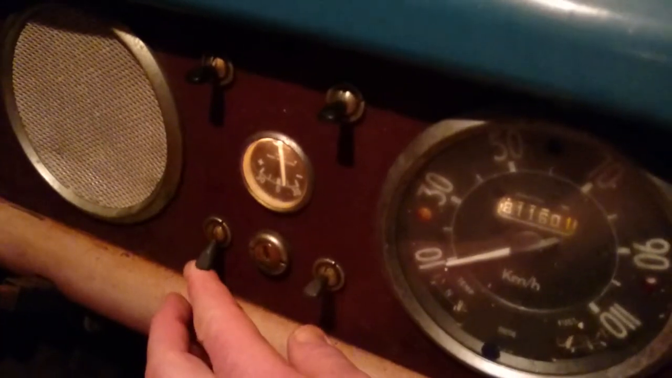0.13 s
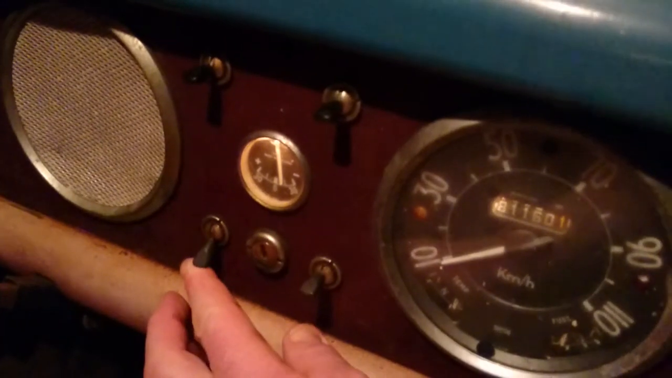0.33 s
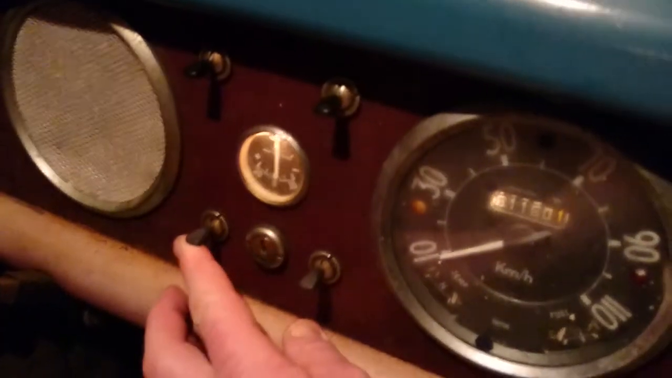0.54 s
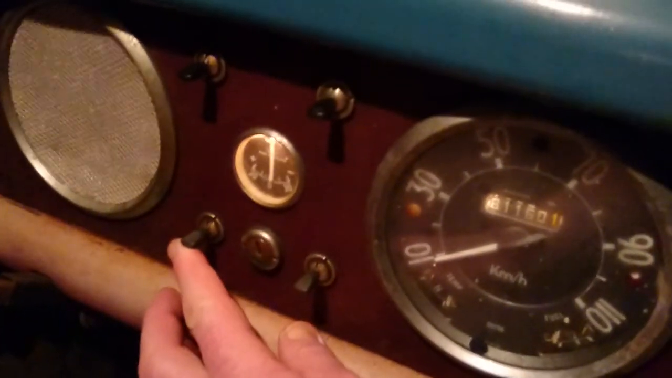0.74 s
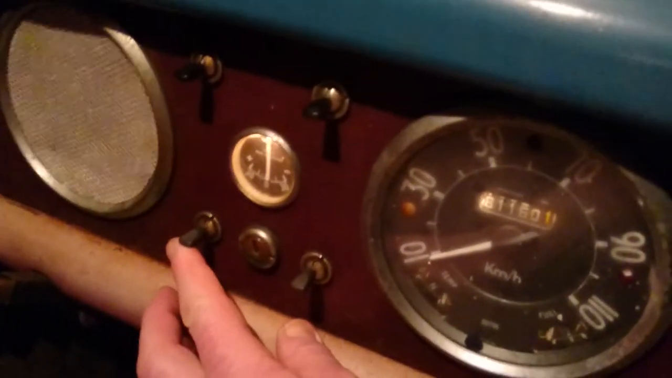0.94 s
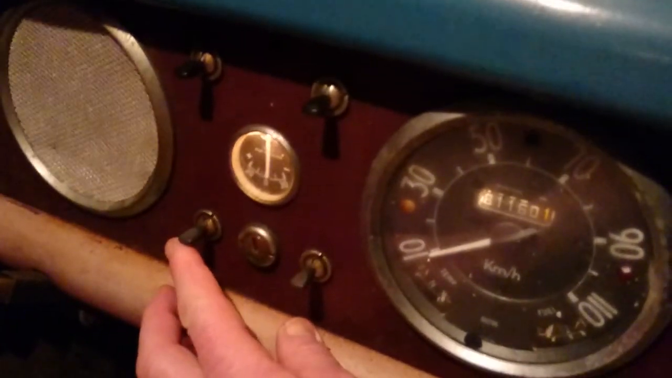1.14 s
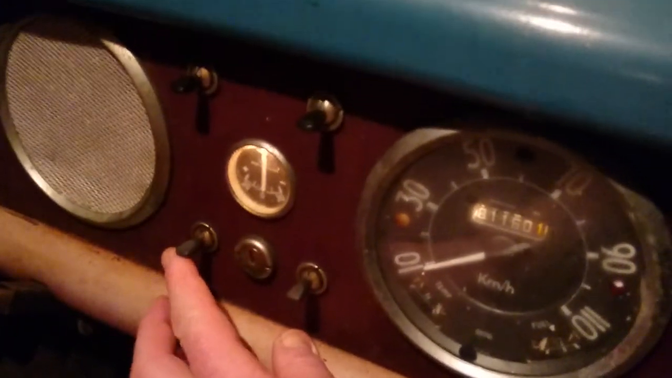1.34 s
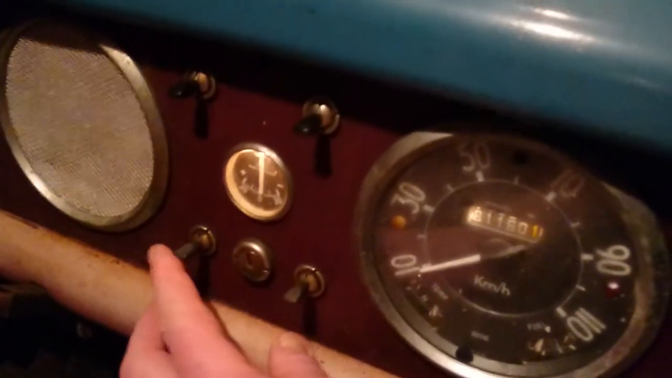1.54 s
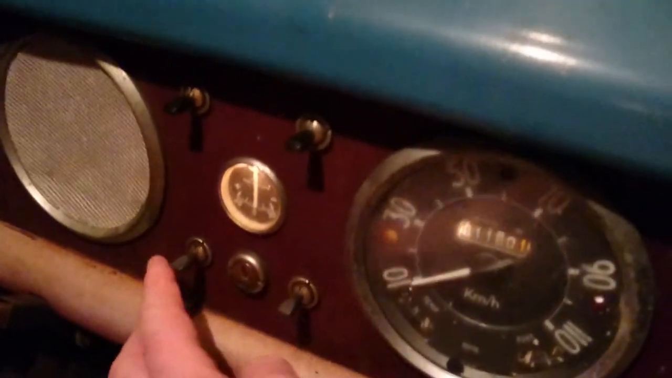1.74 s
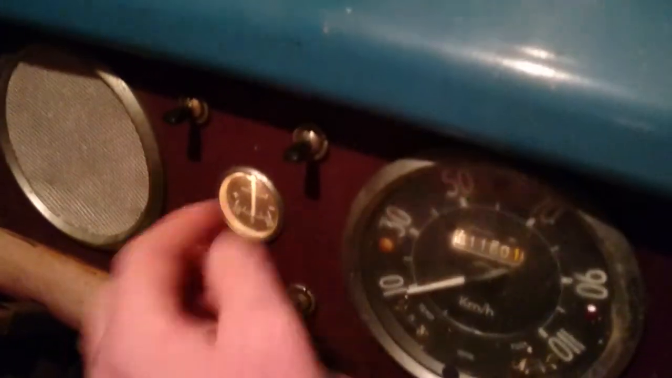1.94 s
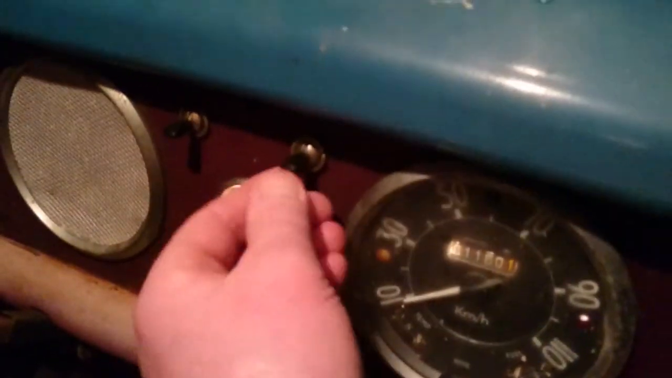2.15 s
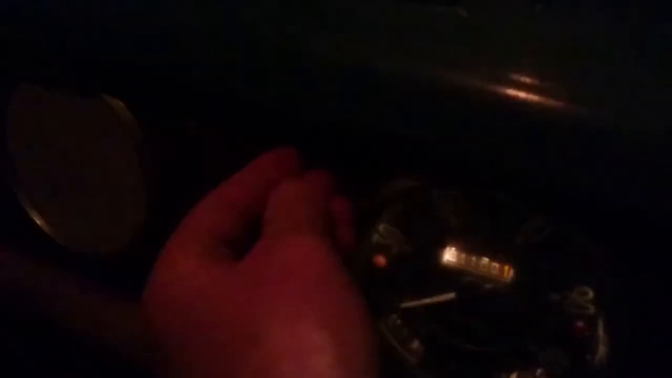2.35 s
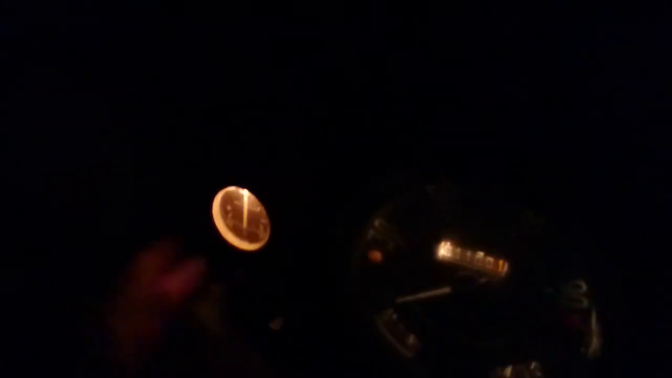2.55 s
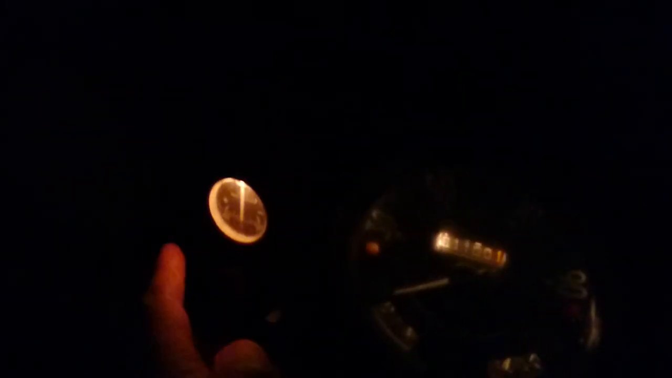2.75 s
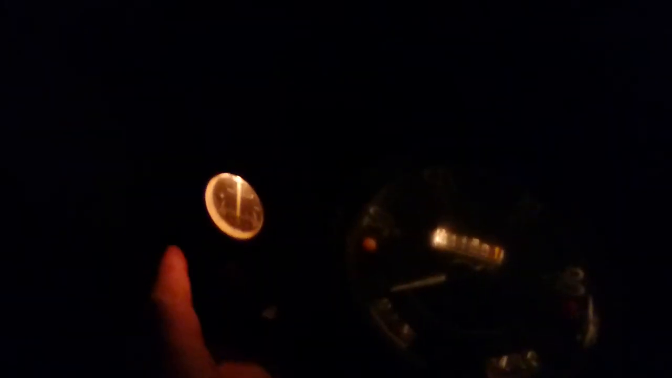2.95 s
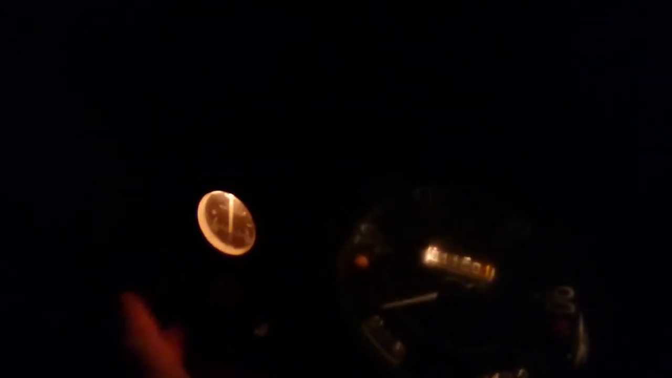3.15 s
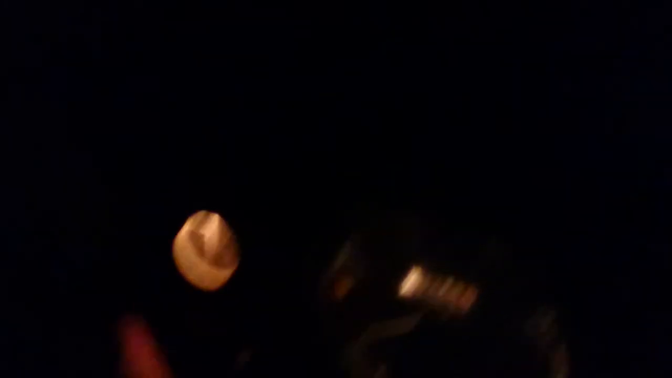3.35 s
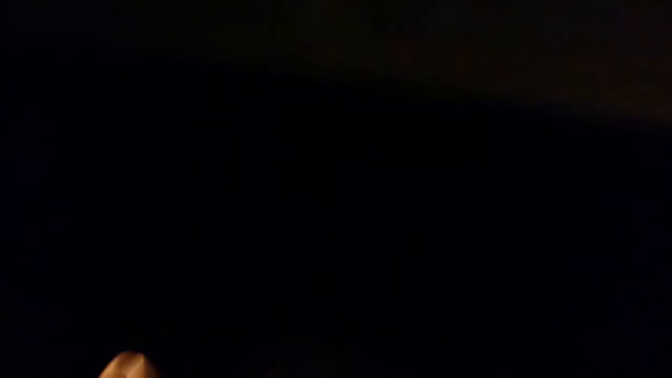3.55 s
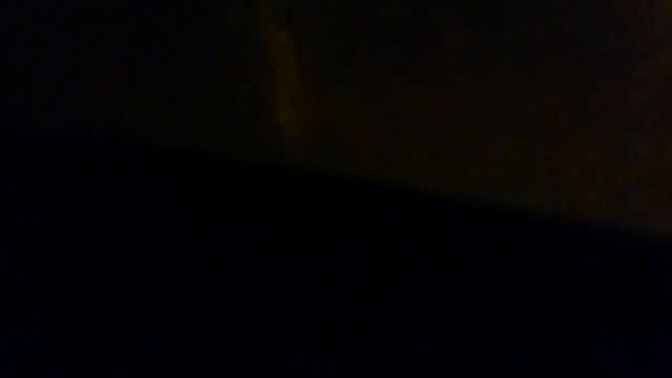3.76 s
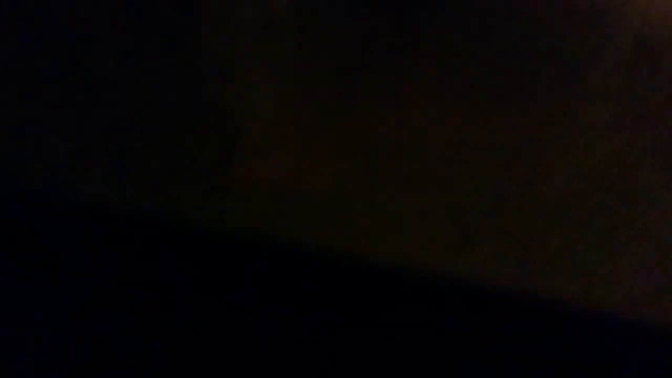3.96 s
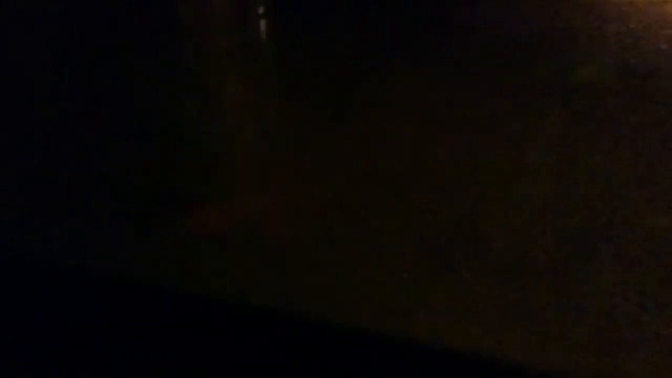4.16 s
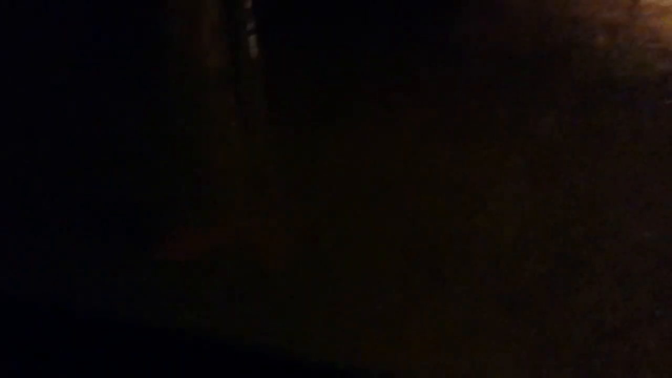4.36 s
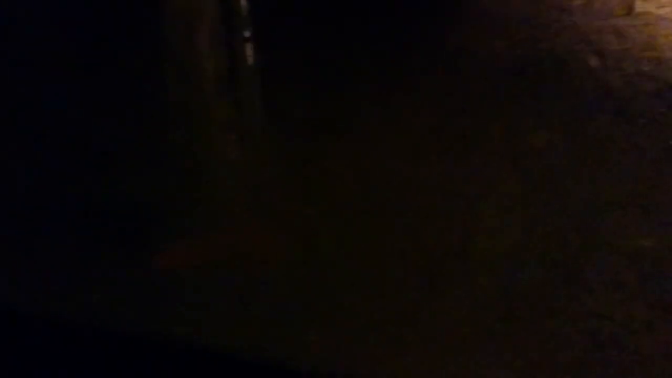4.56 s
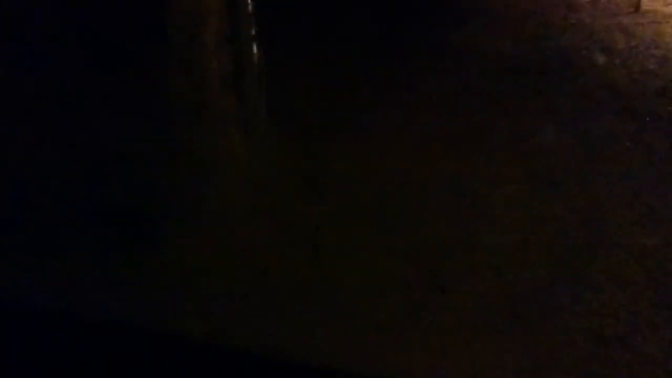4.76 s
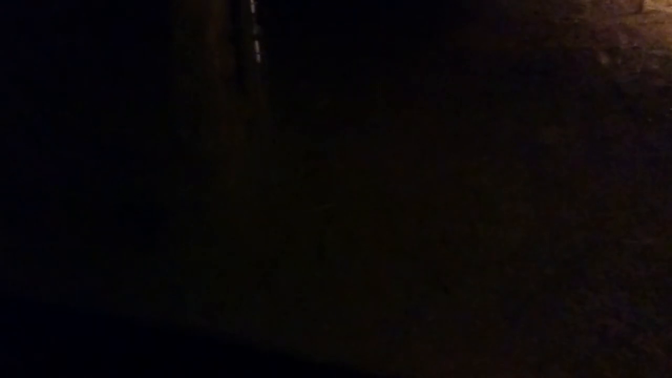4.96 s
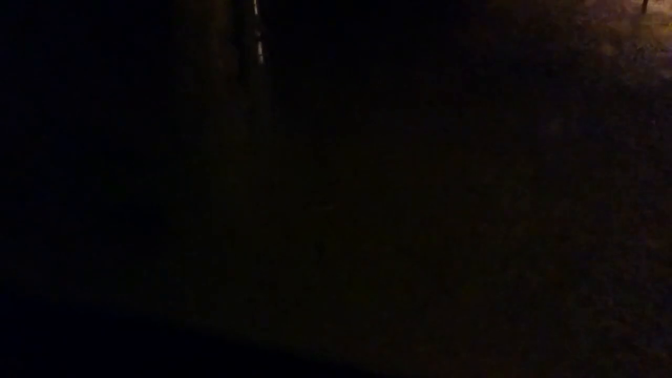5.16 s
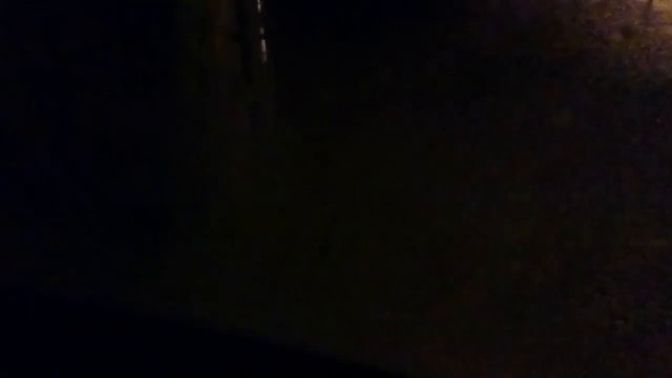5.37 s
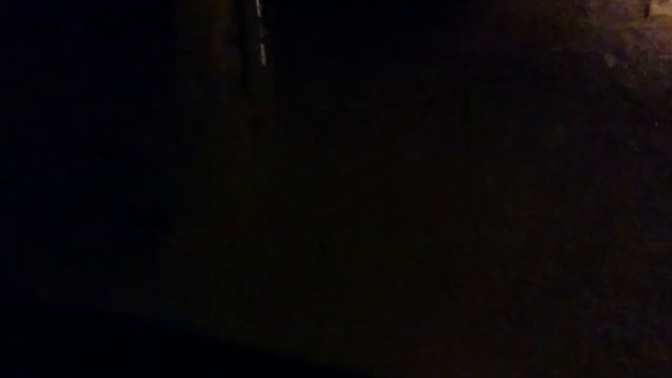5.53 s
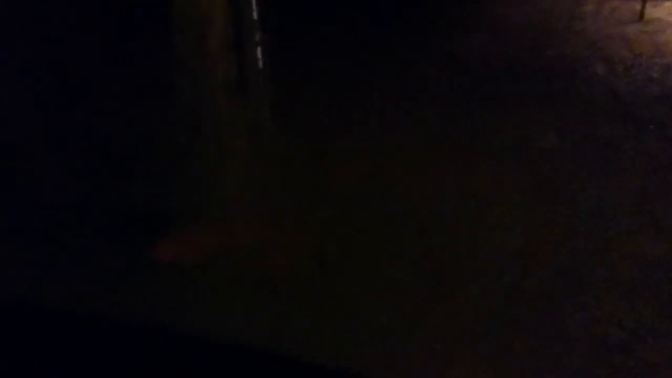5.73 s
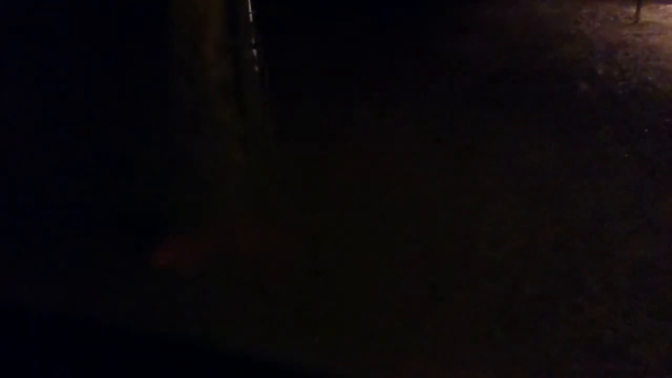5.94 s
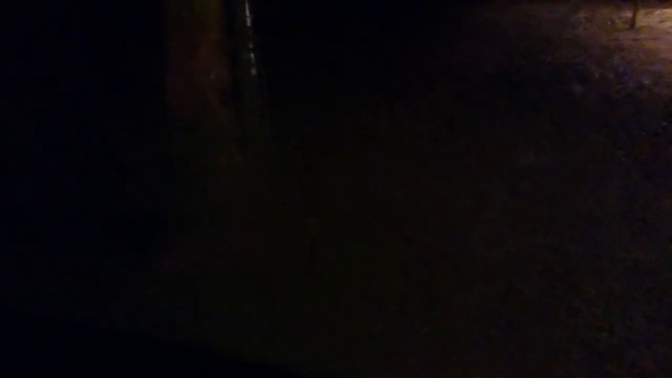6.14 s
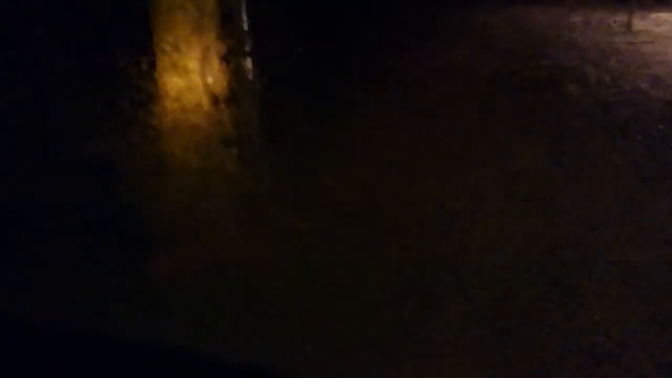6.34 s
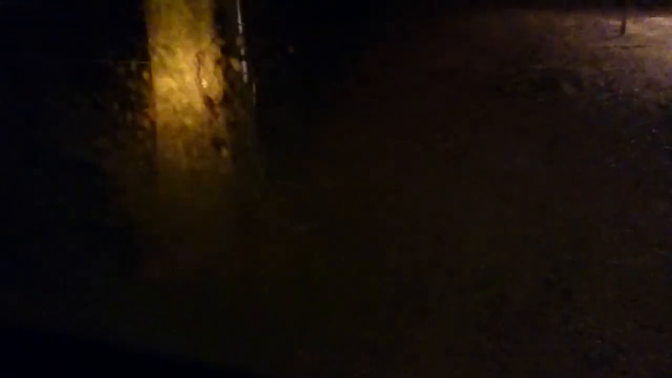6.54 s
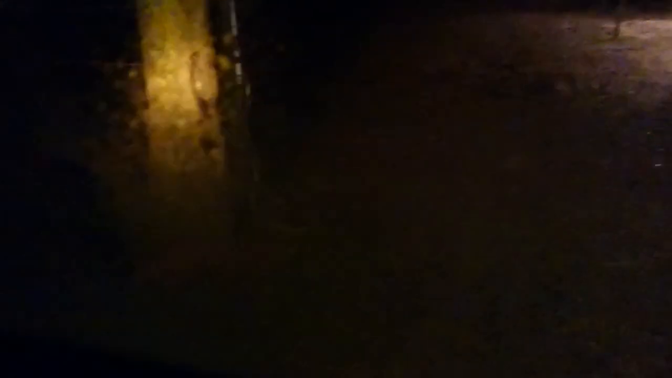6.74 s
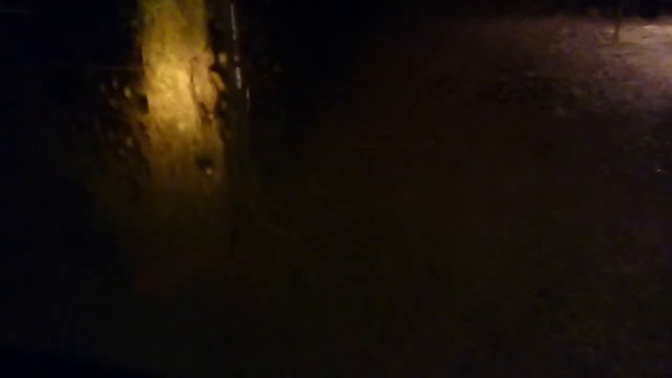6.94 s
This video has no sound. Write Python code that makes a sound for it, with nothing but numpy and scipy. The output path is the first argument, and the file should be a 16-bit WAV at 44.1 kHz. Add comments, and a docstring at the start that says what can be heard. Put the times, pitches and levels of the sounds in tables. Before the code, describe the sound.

Close, crisp switch clicks stand far above a quiet background of steady low humming and thin airy hiss. After two widely spaced snaps come faint creaks and a brush of cloth as the microphone swings from dashboard to windscreen; then three more snaps follow within little over a second. The tight, dry cab gives each a very short noisy tail, and the panel knocks dully beneath the bright tick.

```python
"""In the small cab of an old van, metal toggle switches on the dashboard snap over five times, close by.
Each blow is a sharp click with a ringing lever; the cab answers with a short noisy tail, the panel with fading tones.
A motor hums far off as wavering tones over low noise. Creaking trim and a rustling sleeve are short shaped noises.
Night air is a faint hiss with fuzzy whistles. A hand-held pair of microphones swings from dash to windscreen."""
import sys
import numpy as np
from scipy import signal
from scipy.io import wavfile
from scipy.ndimage import uniform_filter1d

SR = 44100
rng = np.random.default_rng(int(sys.argv[2]) if len(sys.argv) > 2 else 0)


def unload_wav(signal):
    """Save mono or channel-first audio to the path in sys.argv[1] as 16-bit WAV at rate SR, clipped to [-1, 1]."""
    wavfile.write(
        sys.argv[1],
        SR,
        np.round(np.clip(np.atleast_2d(signal).T, -1, 1) * 32767).astype(np.int16),
    )


def nominal_scale(level):
    """Amplitude ratio for a level in decibels (scalar or array-like)."""
    x = np.asarray(level, float) / 20
    return 10 ** x


N = 308655  # length of the scene in samples

# Five throws of the toggle switches. Each row: start in seconds, level of the snap in dB, level of the
# panel's low knock in dB, level of its high ping in dB, left over right in dB (snap only).
THROWS = [(0.3735, -21, -27.5, -21, -1), (2.2464, -17, -43, -42.5, 0.5), (4.8131, -18.5, -27, -22.5, 2.5),
          (5.486, -16, -24.5, -15.5, 1.5), (5.9967, -16.5, -21.5, -34, 0)]
# The sprung contact lets go, lands and bounces. Each row: time in seconds, strength in dB against the
# other blows of its throw, pitch of the ringing lever in Hz, level of that ring in dB.
BLOWS = [(0.3736, 7, 6560, 0), (0.3758, 8.5, 6400, -25.5), (0.3804, 4.5, 5900, 1),
         (2.2493, -27.5, 7070, -35), (2.2497, 14.5, 6060, 6.5), (2.2513, -3.5, 3600, -30),
         (4.8137, 11.5, 8800, 1.5), (4.8153, -1, 3540, -13.5), (4.8168, 8.5, 3555, 3.5),
         (5.4885, 8.5, 9290, 1), (5.4899, -2, 9220, -3.5), (5.4910, 15.5, 5000, -0.5),
         (5.9973, 7, 5680, -7.5), (5.9995, -2, 3483, 0), (6.0004, -14, 6545, -16)]


def evened(x):
    """Scales a sound to an rms of one."""
    return x / np.sqrt(np.mean(x ** 2) + 1e-20)


def read(points, hz):
    """Reads a table of (Hz, value) between its rows, along a logarithmic pitch scale."""
    f, value = np.transpose(points)
    return np.interp(np.log(hz + 1), np.log(f + 1), value)


def add(mix, s, sound):
    """Adds a sound to the mix from s seconds on, cut off where the mix ends."""
    part = mix[..., round(s * SR):][..., :sound.shape[-1]]
    part += sound[..., :part.shape[-1]]


def noise(colour, count, size, patchy_db=0., t60=None, alike=None):
    """Makes noise for two ports from random short spectra, alike by band, with drifting patches and a decay."""
    if alike is None:
        # How alike the ports are. Each row: pitch in Hz, likeness (1 the same, 0 unrelated, -1 opposite).
        alike = [(60, -.99), (200, -.985), (380, -0.78), (700, -0.12), (1300, 0.49), (2400, 0.021)]
    frames = 4 * count // size + 5
    hz = np.fft.rfftfreq(size, 1 / SR)
    a, b, c, d, patches = rng.standard_normal((frames, len(hz), 5)).T
    patches = uniform_filter1d(patches, size=12, axis=0)
    patches = evened(uniform_filter1d(patches, size=10, axis=1))
    same = np.clip(read(alike, hz), -1, 1)[:, None]
    left = a + 1j * b
    right = same * left + np.sqrt(1 - same ** 2) * (c + 1j * d)
    db = read(colour, hz)[:, None] + patchy_db * patches
    if t60:
        frame_s = np.arange(frames) * size / 4 / SR
        db = db - 60 * frame_s / read(t60, hz)[:, None]
    spectra = np.array([left, right]) * nominal_scale(db)
    sound = signal.istft(spectra, nperseg=size, noverlap=3 * size // 4)[1]
    return evened(sound[:, :count])


def causal(colour):
    """Makes a click of the given spectrum that starts at once (minimum phase)."""
    hz = abs(np.fft.fftfreq(4096, 1 / SR))
    log_gain = np.log(nominal_scale(np.maximum(read(colour, hz), -80)))
    return np.fft.ifft(np.exp(np.conj(signal.hilbert(log_gain)))).real[:1024]


def slow_sways(count):
    """Two slow random curves, smoothly joined through count random points each."""
    return evened(signal.resample(rng.standard_normal((count, 2)), N).T)


def facing_glass():
    """How far the microphones have swung from the dash (0) to the windscreen (1), moment by moment."""
    # Each row: time in seconds, share of the swing.
    turn = [(0, 0.015), (1.5, 0.25), (3, 0.44), (4.2, 0.93), (5.2, .88), (7, 0.99)]
    return np.interp(np.arange(N) / SR, *np.transpose(turn))


def blows_of(start):
    """The blows that belong to one throw."""
    return [blow for blow in BLOWS if abs(blow[0] - start) < .02]


def switches():
    """Each throw is heard as ringing levers, bright snaps in the cab and a sounding dash panel."""
    return lever_rings() + cab_snaps() + panel_knocks()


def lever_rings():
    """Each blow sets its metal lever ringing as one fast-dying sine."""
    turns_to_60_db_down, rise_s, port_lag_s = 42, .0004, 0.00034
    out, t = np.zeros((2, N)), np.arange(SR // 3) / SR
    for s, _, hz, ring_db in BLOWS:
        phases = 2 * np.pi * rng.random() + np.array([0, np.pi / 2])
        for port, phase in enumerate(phases):
            size = nominal_scale(ring_db - 60 * t * hz / turns_to_60_db_down) * (1 - np.exp(-t / rise_s))
            # the right port is a little farther: it hears the ring some whole cycles later
            late = round(port * port_lag_s * hz) / hz
            add(out[port], s + late, size * np.sin(2 * np.pi * hz * t + phase))
    return out


def snap_colour(dip_db, knee_hz, knee_db, crest_hz, top_db):
    """The snap's spectrum: a low thud, a dip, a step up to the bright body, a crest and a falling top shelf."""
    thud_db = dip_db + 5.5
    sag_hz = min(1.6 * knee_hz, 3050)  # past the knee the colour sags before it climbs to the body
    return [(160, thud_db - 6), (485, thud_db), (800, dip_db), (.84 * knee_hz, dip_db), (knee_hz, knee_db),
            (sag_hz, knee_db - 3), (3600, -4), (4500, -6), (crest_hz, -3),
            (1.3 * crest_hz, top_db + 5.5), (15500, top_db - 4)]


def cab_snaps():
    """Clicks of the contact pass through the cab's dense short tail of dying noise."""
    # The colour of each throw. Each row: dip in dB, knee in Hz where the bright snap sets in,
    # knee in dB, crest in Hz, setting of the top shelf in dB.
    snap_shapes = [(-18, 1950, -8, 6400, -12.5), (-25, 1220, -10, 5500, -19.5), (-23, 2620, -3.5, 5800, -8),
                   (-18, 2600, -5, 4400, -8.5), (-20.5, 2050, -6.5, 6400, -17.5)]
    # How fast the cab dies away. Each row: pitch in Hz, seconds to fall by 60 dB.
    cab_decay = [(300, 0.24), (700, 0.14), (2000, 0.11), (4000, .12), (7000, 0.1), (12000, .12)]
    lead_s = .002  # room ahead of the throw's start
    rise_s, early_db, early_s = .0012, 6.0, 0.0013
    out, t = np.zeros((2, N)), np.arange(SR // 3) / SR
    for (start, snap_db, _, _, pan_db), shape in zip(THROWS, snap_shapes):
        click = causal(snap_colour(*shape))
        clicks = np.zeros(len(t))
        for s, db, *_ in blows_of(start):
            add(clicks, s - start + lead_s, nominal_scale(db) * click)
        cab = noise([(20, 0.0033), (20000, 0)], len(t), size=128, t60=cab_decay)
        cab *= 1 - np.exp(-t / rise_s)
        cab *= 1 + nominal_scale(early_db) * np.exp(-t / early_s)  # near surfaces answer first
        snap = signal.fftconvolve(clicks[None], cab, axes=1)[:, :len(t)]
        snap *= nominal_scale(snap_db) / snap[:, :3000].std()
        add(out, start - lead_s, snap * nominal_scale(np.array([[pan_db], [-pan_db]]) / 2))
    return out


def panel_knocks():
    """The hardest blow of each throw shakes the dash panel, whose own tones sound and die away."""
    # Tones of the panel. Each row: pitch in Hz, level in dB against the knock or ping,
    # seconds to fall by 60 dB.
    panel = [(58, 2, .22), (109, 3.5, .1), (178.6, 2.5, .1), (258, 1.5, 0.065), (347, 5, 0.076),
             (405, 4.5, 0.031), (487, 8.5, 0.075), (647, -4, .08), (776.6, -3, 0.23), (2587, -3, 0.12),
             (2616, -4.5, 0.12), (2710, -5.5, 0.15)]
    out, t = np.zeros((2, N)), np.arange(SR // 3) / SR
    for start, _, knock_db, ping_db, _ in THROWS:
        landing = max((db, s) for s, db, *_ in blows_of(start))[1]
        for hz, mode_db, t60 in panel:
            high = hz > 1000
            db = mode_db + (ping_db if high else knock_db) + 2 * rng.standard_normal()
            rise_s = 0.01 if high else 1.8 / hz  # the high tones build up slowly
            size = nominal_scale(db - 60 * t / t60) * (1 - np.exp(-t / rise_s))
            # the ports hear opposite phases; the high ping is also a quarter turn apart
            angle = 2 * np.pi * (hz * t + high * np.array([[0], [1 / 4]]))
            add(out, landing, size * np.sin(angle) * [[.85], [-1]])
    return out


def hum():
    """A far motor: wavering multiples of its speed and higher tones, over a low wash and booming noise."""
    # Multiples of the motor's speed, from 1 up. Each row: rms level in dB facing the dash, rms level
    # in dB facing the glass, left over right in dB, lag of the right port in radians.
    multiples = [(-44.5, -39, 0, 0.25), (-44, -43, -1.3, 0.29), (-79, -49, -2, 0.13), (-67.5, -56, 2, 0.71),
                 (-65, -62, -2.5, 0.15)]
    # Higher motor tones. Each row: pitch in Hz, rms level in dB.
    whine = [(511, -71), (823, -68.5)]
    # Steady low wash. Each row: pitch in Hz, relative level in dB per Hz.
    rumble = [(20, -8.5), (50, -6), (110, -8), (170, -5.5), (200, -10.5), (240, -3), (290, -1.5),
              (400, -7.5), (440, -19), (550, -18), (700, -26), (1500, -53.5)]
    # Low booming noise gathered around the first two hum tones.
    # Each row: pitch in Hz, relative level in dB per Hz.
    boom = [(20, -41), (45, -38), (58, -15.5), (68, -9), (77, 11.5), (84, -10.5), (90, -14), (125, -30),
            (146, -15), (153, -0.5), (162, -27.5), (200, -58.5)]
    # Level of that boom: rms in dB facing the dash, then facing the glass.
    boom_levels = (-47, -45)
    motor_hz, rumble_db, wander_rad, sway_db = 76.85, -53, 0.39, 0.43
    turned = facing_glass()
    boom_db = boom_levels[0] + (boom_levels[1] - boom_levels[0]) * turned
    out = nominal_scale(boom_db) * noise(boom, N, size=8192)
    out += nominal_scale(rumble_db) * noise(rumble, N, size=2048)
    tones = []
    for k, (dash_db, glass_db, pan_db, lag) in enumerate(multiples, start=1):
        tones.append((k * motor_hz, dash_db + (glass_db - dash_db) * turned, pan_db, lag))
    for hz, db in whine:
        tones.append((hz, db, -2, .4))
    for hz, db, pan_db, lag in tones:
        sway, drift = slow_sways(60)
        angle = 2 * np.pi * hz * np.arange(N) / SR + wander_rad * drift + 2 * np.pi * rng.random()
        size = np.sqrt(2) * nominal_scale(db + sway_db * sway)
        left = nominal_scale(pan_db / 2) * np.sin(angle)
        right = -nominal_scale(-pan_db / 2) * np.sin(angle - lag)  # the ports hear it in opposition
        out += size * np.array([left, right])
    return out


def creaks():
    """Trim creaks: short grainy slips, each noise in one broad resonance."""
    # Each row: start in seconds, length in seconds, level at the height of the swell in dB, pitch in Hz.
    slips = [(2.669, .08, -66.5, 5950), (2.964, .06, -65, 4460), (3.083, 0.053, -58.5, 6000),
             (3.278, 0.062, -52.5, 3500), (3.822, 0.055, -56, 3630), (3.885, .06, -66, 6000),
             (5.29, 0.045, -66, 3400)]
    width, skew = 1130, 0.54  # Hz; a skew below 1 makes the slip swell fast and die slowly
    out = np.zeros((2, N))
    for s, length, db, hz in slips:
        peak = [(max(hz - 2 * width, 300), -30), (hz - width / 2, -4), (hz, 0), (hz + width / 2, -5),
                (hz + 1.1 * width, -13), (hz + 3 * width, -15), (hz + 4 * width, -40)]
        count = round(length * SR)
        swell = np.sin(np.pi * (np.arange(count) / count) ** skew)
        add(out, s, nominal_scale(db) * swell * noise(peak, count, size=64, patchy_db=1.5))
    return out


def rustles():
    """A sleeve brushes: soft bright swishes of noise that swell and fade."""
    # Each row: start in seconds, length in seconds, level in dB before the swell shapes it.
    brushes = [(0.094, .26, -63.5), (2.85, 0.33, -69), (3.062, 0.11, -62.5), (5.324, 0.21, -65),
               (5.512, 0.34, -61)]
    colour = [(1500, -20), (5000, -3), (9000, 0), (15000, -2)]  # Hz, dB
    out = np.zeros((2, N))
    for s, length, db in brushes:
        count = round(length * SR)
        cloth = noise(colour, count, size=256, patchy_db=1.)
        add(out, s, nominal_scale(db) * cloth * np.hanning(count))
    return out


def night_air():
    """A far hiss, faded in as the recorder opens and dying away at the end, over the microphones' own noise."""
    # Colour of the hiss. Each row: pitch in Hz, relative level in dB per Hz.
    hiss = [(400, -7.5), (600, -6), (1000, -10.5), (1500, -7.5), (2200, -10.5), (3600, -11.5),
            (4400, -18.5), (6300, -13.5), (7600, -18), (8500, -17.5), (10500, -24.5), (11300, -35.5),
            (16000, -47)]
    # Each port's own noise, unrelated between them. Each row: pitch in Hz, relative level in dB per Hz.
    own_noise = [(20, -8.5), (40, -2), (110, 2.5), (200, -5.5), (500, -10.5), (1500, -19), (3000, -28.5),
                 (4500, -37.5), (6200, -40), (9000, -37), (12000, -37.5), (16000, -46)]
    t = np.arange(N) / SR
    hiss_db = -59.5 - 3.5 * facing_glass()  # weaker once the microphones face the glass
    hiss_db += -22 * np.maximum(1 - t / 0.18, 0)  # the recorder opens from 22 dB down over 0.18 s
    hiss_db += -12.5 * np.maximum(t - 6.1, 0)  # from 6.1 s on it falls by 12.5 dB a second
    out = nominal_scale(hiss_db) * noise(hiss, N, size=1024, patchy_db=1.66) + whistles()
    return out + nominal_scale(-58) * noise(own_noise, N, size=2048, alike=[(20, 0), (20000, 0)])


def whistles():
    """Faint whistly bands in the hiss: slow random wobbles shifted up to a gliding pitch."""
    # Each row: start in seconds, end in seconds, first pitch in Hz, last pitch in Hz,
    # level in dB before its waver and fades.
    bands = [(.3, 4.1, 1606, 1510, -74.5), (3.8, 6.8, 1470, 1423, -82), (0, 3.9, 2797, 2820, -69),
             (.6, 4.0, 4830, 5000, -75.5), (1.1, 2.6, 6300, 6400, -77), (2.6, 4, 7700, 7170, -72),
             (3.8, 6.4, 6702, 6150, -77)]
    fade_s, waver_db = 0.41, 1.76
    width, drift_share = 0.13, .012  # shares of the pitch
    out, t = np.zeros((2, N)), np.arange(N) / SR
    for start, end, first_hz, last_hz, db in bands:
        fade = np.clip(np.minimum(t - start, end - t) / fade_s, 0, 1)
        waver, drift = slow_sways(40)
        hz = np.interp(t, [start, end], [first_hz, last_hz]) * (1 + drift_share * drift)
        r = np.exp(-np.pi * width * first_hz / SR)
        a, b = rng.standard_normal((2, 2, N))
        wobble = signal.lfilter([1], np.convolve([1, -r], [1, -r]), a + 1j * b)
        fuzz = (wobble * np.exp(2j * np.pi * np.cumsum(hz) / SR)).real
        out += nominal_scale(db + waver_db * waver) * fade * evened(fuzz)
    return out


def scene():
    """All the sources together, as they reach the two ports."""
    return switches() + hum() + creaks() + rustles() + night_air()


def band_limit(x):
    """A steep low-pass at the top of the band."""
    return signal.sosfilt(signal.butter(12, 16850, fs=SR, output="sos"), x)


def record(dry):
    """The ports colour the sound apart, a limiter holds the snaps down, and the top treble is cut."""
    # How the ports differ. Each row: pitch in Hz, left over right in dB.
    port_tilt = [(150, 0), (300, -1.5), (500, -1.5), (1300, -1.5), (2500, -0.5), (3500, -0.5), (4800, 2.5),
                 (5600, -1.5), (6400, -7.5), (7600, -1.5), (9000, -2), (15000, 3)]
    # Upper edge of the treble. Each row: pitch in Hz, gain in dB.
    top_edge = [(15000, 0.5), (15500, -2), (15700, -27), (16700, -33.5), (17000, -83)]
    knee_db, squeeze = -4.0, 0.45  # share of the dB above the knee that is taken away
    attack_s, release_db_s = 0.00055, 351.5
    ports = np.array([causal([(hz, side * db / 2) for hz, db in port_tilt]) for side in (1, -1)])
    x = signal.oaconvolve(dry, ports, axes=1)[:, :N]
    # the peak reading jumps up at once and falls back at a steady rate
    fall = np.arange(N) * release_db_s / SR
    peak_db = np.maximum.accumulate(20 * np.log10(abs(x).max(0) + 1e-9) + fall) - fall
    r = np.exp(-1 / (attack_s * SR))
    cut_db = signal.lfilter([1 - r], [1, -r], squeeze * np.maximum(peak_db - knee_db, 0))
    x = x / nominal_scale(cut_db)
    rounded = .95 * np.tanh(x / .95)  # soft ceiling
    x = signal.oaconvolve(rounded, causal(top_edge)[None], axes=1)[:, :N]
    return band_limit(x - .0013)  # a small constant offset


dry = scene()
out = record(dry)
unload_wav(out)
```